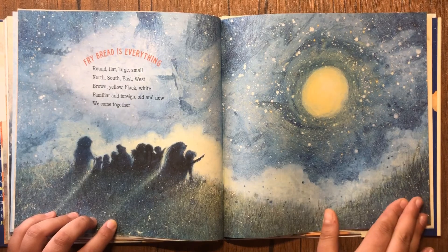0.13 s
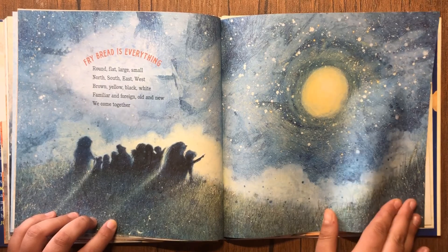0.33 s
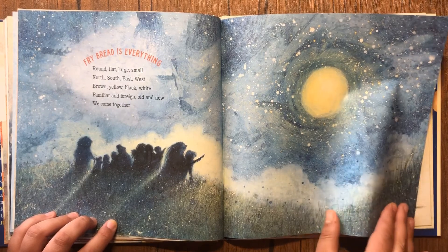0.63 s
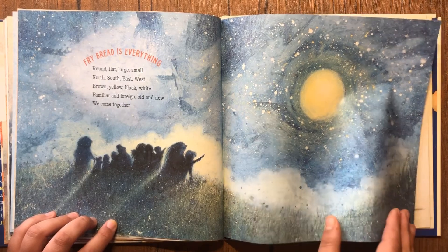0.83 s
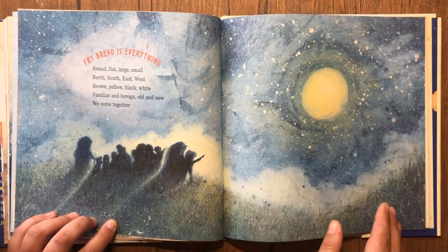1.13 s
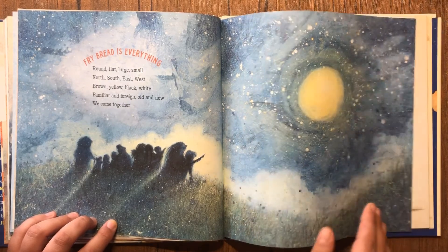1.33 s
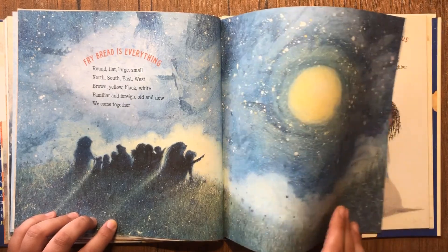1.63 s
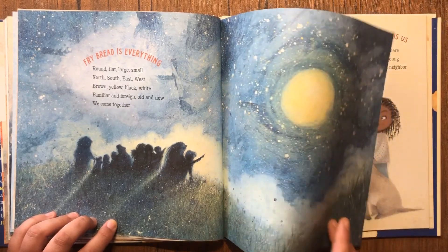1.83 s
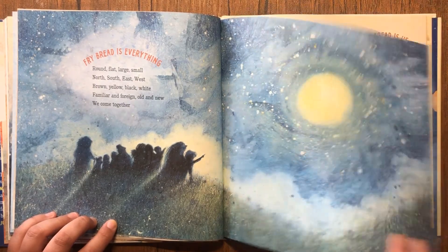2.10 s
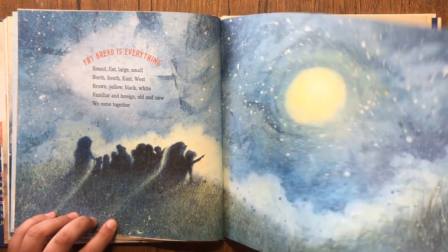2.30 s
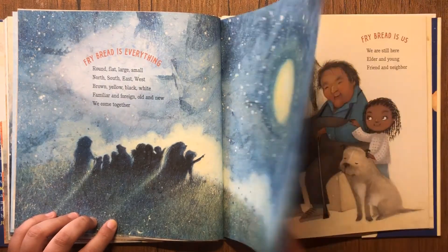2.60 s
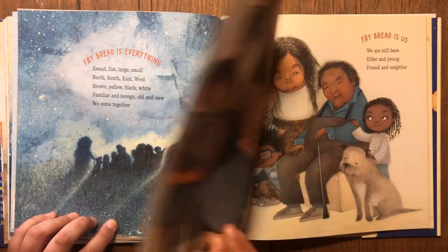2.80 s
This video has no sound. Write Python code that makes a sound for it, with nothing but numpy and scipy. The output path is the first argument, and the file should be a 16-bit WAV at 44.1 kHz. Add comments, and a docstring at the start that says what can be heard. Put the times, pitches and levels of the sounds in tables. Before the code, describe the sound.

A stiff book page is turned by hand, close to the microphone in a quiet room. Fingers push the paper, it pops once, slides with a hiss, then swings over with sharp ticks and dull pops.

```python
"""A table in a quiet room, one microphone close to a hardcover picture book as a stiff page is turned.
Over a low murmur of air, fingers push the sheet into an arch; at one second they grip it and it pops.
Its edge slides over the page below, and the resonance of the hollow under it falls as the hollow deepens.
Just after two seconds it slips free and swings over, buckling with dull pops, a brief hum and sharp ticks."""
import sys
import numpy as np
from scipy import signal
from scipy.fft import rfft, irfft, next_fast_len
from scipy.io import wavfile
from scipy.ndimage import uniform_filter1d, map_coordinates

SR = 44100
rng = np.random.default_rng(int(sys.argv[2]) if len(sys.argv) > 2 else 0)


def output_pcm(signal):
    """Save a mono or channel-first signal as 16-bit PCM at the path in sys.argv[1].

    Samples are clipped to [-1, 1] before scaling.
    """
    pcm = np.clip(np.atleast_2d(signal).T, -1, 1) * 32767
    wavfile.write(sys.argv[1], SR, np.round(pcm).astype(np.int16))


N = 130095
T = np.arange(N) / SR


def amp(db):
    """Decibels to gain."""
    return 10 ** (np.asarray(db) / 20)


def unit(x):
    """Scale to rms 1."""
    return x / np.sqrt(np.mean(x ** 2) + 1e-20)


def gain_at(colour, hz):
    """Gain between (Hz, dB) points, on a log frequency axis."""
    points_hz, points_db = np.transpose(colour)
    return amp(np.interp(np.log(hz + 1), np.log(points_hz), points_db))


def curve(rows, t, column=1):
    """One column of a control table at times t."""
    rows = np.array(rows)
    return np.interp(t, rows[:, 0], rows[:, column])


def level(rows):
    """Gain along (seconds, dB) rows, silent outside them."""
    return amp(curve(rows, T)) * (T >= rows[0][0]) * (T <= rows[-1][0])


def wander(per_s):
    """A smooth curve through per_s random values a second."""
    return map_coordinates(rng.standard_normal(N // 100), [T * per_s])


def coloured(x, gain):
    """Minimum-phase filter with the given gain over frequency."""
    size = 2 * next_fast_len(N // 2 + SR // 8)
    hz = np.fft.rfftfreq(size, 1 / SR)
    cepstrum = irfft(np.log(np.maximum(gain(hz), 1e-6)))
    cepstrum[1:size // 2] *= 2
    cepstrum[size // 2 + 1:] = 0
    return irfft(rfft(x, size) * np.exp(rfft(cepstrum)), size)[:N]


def slips(per_s, share):
    """Tiny random slips over a smooth hiss; share is their part of the power."""
    grains = (rng.random(N) < per_s / SR) * rng.standard_normal(N)
    return np.sqrt(share) * unit(grains) + np.sqrt(1 - share) * rng.standard_normal(N)


# The air all around the table. Each row: frequency in Hz, relative level in dB.
AIR_COLOUR = [(20, -29), (50, -2.5), (88, 2.5), (130, 3), (180, 0.5), (400, -3.5), (1000, -13.5),
              (3000, -21), (8000, -25), (15500, -26.5)]
# Faint steady tones in the room. Each row: frequency in Hz, level in dB.
ROOM_TONES = [(87, -64.5), (11800, -86)]


def room_tone():
    """Behind the book, a low murmur of air with a wavering hum and a faint whine."""
    air = amp(-57) * unit(coloured(rng.standard_normal(N), lambda hz: gain_at(AIR_COLOUR, hz)))
    tones = np.zeros(N)
    for hz, db in ROOM_TONES:
        drift = 0.027 * np.cumsum(rng.standard_normal(N))
        tones += amp(db) * unit(np.sin(2 * np.pi * hz * T + drift))
    return air + tones


def walls(x, t60_s=0.22, delay_s=0.004):
    """The short, soft answer of the walls, reaching the microphone just after the direct sound."""
    t = T[:SR // 2]
    dull_noise = signal.lfilter([1], [1, -0.6], rng.standard_normal(len(t)))
    tail = dull_noise * amp(-60 * t / t60_s) * (t > delay_s)
    return signal.fftconvolve(x, tail / np.linalg.norm(tail))[:N]


# The hum of the taut sheet. Each row: time in seconds, level in dB, pitch in Hz.
SHEET_HUM = [(2.19, -49, 688), (2.208, -35.5, 623), (2.24, -38, 552), (2.285, -48, 545)]


def sheet_hum():
    """One bending mode sings briefly and sinks as the sheet relaxes."""
    pitch_hz = curve(SHEET_HUM, T, 2) * (1 + 0.051 * wander(per_s=160))
    rasp = 1 + 0.5 * wander(per_s=220)
    return level(SHEET_HUM) * unit(rasp * np.sin(2 * np.pi * np.cumsum(pitch_hz) / SR))


# Sharp ticks of the paper. Each row: start in seconds, level in dB, seconds to fade by 60 dB.
EDGE_TICKS = [(.856, -42.5, .019), (2.012, -37, 0.019), (2.104, -35, .025), (2.1123, -26, 0.031),
              (2.53, -50, .02), (2.589, -32.5, 0.017)]
# Their colour. Each row: frequency in Hz, relative level in dB.
EDGE_TICK_COLOUR = [(500, -11), (2000, 3.5), (5000, 4), (9000, 0.5), (15500, -11)]


def edge_ticks():
    """The edge of the page cracks in short, bright bursts."""
    envelope = sum(amp(db - 60 * np.maximum(T - start, 0) / t60) * (T >= start)
                   for start, db, t60 in EDGE_TICKS)
    crackle = coloured(slips(per_s=4400, share=0.25), lambda hz: gain_at(EDGE_TICK_COLOUR, hz))
    return envelope * unit(crackle)


# The body of the sheet. Each row: frequency in Hz, relative level in dB.
SHEET_COLOUR = [(40, -50), (110, 0), (160, -10.5), (230, -0.5), (330, -6.5), (550, 3), (780, 1),
                (1000, -3.5), (1250, 0.5), (2000, -2), (8000, 14)]
# Its modes. Each row: multiple of the ring pitch, relative level in dB, seconds to fade by 60 dB.
RING_MODES = [(.4, -11, 0.091), (.7, -9, 0.081), (1.001, -0.5, 0.1), (1.52, 0, 0.024)]
# The sheet buckles. Each row: peak time in seconds, level in dB, seconds to rise by 20 dB, seconds to
# fade by 60 dB, lower and upper band edge in Hz, ring pitch in Hz, relative ring level in dB.
SHEET_BUCKLES = [(.986, -21.5, 0.0071, 0.043, 765, 1750, 824, -22),
                 (.9915, -23.5, 0.0011, 0.036, 920, 1547, 804, -3),
                 (1.652, -35, 0.022, .12, 525, 1180, 1132, -2),
                 (1.988, -32.5, 0.032, 0.1, 251, 1190, 903, 2.5),
                 (2.016, -44, .005, 0.26, 250, 1200, 630, -4), (2.106, -38, .004, .3, 250, 1350, 640, -12),
                 (2.168, -31.5, .015, 0.17, 70, 1180, 696, -11),
                 (2.188, -32.5, .018, 0.13, 121, 1370, 823, 2),
                 (2.333, -30.5, 0.019, 0.2, 130, 1170, 805, -8.5),
                 (2.565, -29.5, 0.016, 0.13, 350, 1380, 672, -4),
                 (2.611, -31, 0.022, 0.19, 60, 1390, 674, -1),
                 (2.682, -39, 0.035, 0.21, 100, 1060, 708, -3),
                 (2.828, -50.5, 0.0067, 0.25, 77, 760, 600, -8)]


def buckles(edge_order=4.6, sag=0.128, sag_s=0.0398):
    """Each buckle is a cluster of soft snaps that rings the sheet; the ring sinks as the bend relaxes."""
    out = np.zeros(N)
    for peak_s, db, rise, t60, low_hz, high_hz, pitch_hz, ring_db in SHEET_BUCKLES:
        def body(hz):
            low_cut = hz ** 2 / np.hypot(hz ** 2, low_hz ** 2)
            high_cut = 1 / np.sqrt(1 + (hz / high_hz) ** (2 * edge_order))
            return gain_at(SHEET_COLOUR, hz) * low_cut * high_cut

        before, after = np.minimum(T - peak_s, 0), np.maximum(T - peak_s, 0)
        swell = amp(20 * before / rise - 60 * after / t60)
        pop = swell * coloured(slips(per_s=3000, share=0.57), body)
        pop *= np.linalg.norm(swell) / np.linalg.norm(pop)
        cycles = pitch_hz * ((1 - sag) * after + sag * sag_s * (1 - np.exp(-after / sag_s)))
        ring = np.zeros(N)
        for multiple, mode_db, mode_t60 in RING_MODES:
            fade = amp(mode_db + rng.normal() - 60 * after / mode_t60)
            ring += fade * np.sin(2 * np.pi * multiple * cycles)
        out += amp(db) * (pop + amp(ring_db) * ring)
    return out


# The hollow under the arched sheet. Each row: time in seconds, lowest resonance in Hz.
HOLLOW_RESONANCE = [(.22, 2360), (.55, 2090), (.8, 1780), (1.17, 1410), (1.4, 1154), (1.65, 925),
                    (2.05, 790)]


def rub(stroke, colour, bands, peak_db, peak_width, below_db, hinge_hz, grain, flutter_db):
    """Paper slips on paper, and the hiss is coloured by the hollow and by gliding bands."""
    hz, t, spectrum = signal.stft(slips(per_s=5000, share=grain), SR, nperseg=512)
    hz = hz[:, None] + 1
    ratio = hz / curve(HOLLOW_RESONANCE, t)
    hollow_db = peak_db * np.exp(-((ratio - 1) / peak_width) ** 2)
    shelf_db = below_db * (1 - np.tanh((np.log2(ratio) + 0.37) * 7)) / 2  # below the resonance
    bands_db = sum(curve(band, t, 2) * np.exp(-((hz - curve(band, t)) / 184) ** 2) for band in bands)
    brightness_db = curve(stroke, t, 2) * np.log2(np.maximum(hz / hinge_hz, 1))  # above the hinge
    speckle = uniform_filter1d(rng.standard_normal(spectrum.shape), 3, axis=0)
    patches_db = 2.1 * unit(uniform_filter1d(speckle, 12, axis=1))  # the colour shifts at random
    gain = gain_at(colour, hz) * amp(hollow_db + shelf_db + bands_db + brightness_db + patches_db)
    gain /= np.sqrt(np.mean(gain ** 2, axis=0))
    hiss = signal.istft(spectrum * gain, nperseg=512)[1][:N]
    return unit(hiss) * level(stroke) * amp(flutter_db * wander(per_s=90))


# The four strokes of the hand. Each row: time in seconds, level in dB, brightness in dB per octave.
PUSH_STROKE = [(.2, -75, 2), (.224, -38.5, 1), (.28, -38, -0.5), (.31, -45, -3), (.384, -51.5, -1),
               (.424, -42.5, -1.5), (.52, -43.5, -1.5), (.606, -44.5, 0), (.676, -61, -0.5),
               (.705, -50.5, -2.5), (.784, -42, -4.5), (.88, -55, -5.5), (.898, -44.5, -0.5), (.93, -60, 1)]
GRIP_STROKE = [(.942, -60, -5), (.966, -34.5, 2.5), (.988, -40, 3.5), (1.004, -53, 2), (1.015, -47, 0),
               (1.046, -50, -6), (1.058, -36, -3.5), (1.08, -47, -4), (1.11, -77, -7)]
SLIDE_STROKE = [(1.148, -77, -5), (1.16, -37.5, -5), (1.22, -39, -10), (1.352, -36.5, -3), (1.58, -33.5, 0),
                (1.678, -39, 3), (1.91, -37.5, 4.5), (1.97, -41, -5), (1.986, -37.5, 4), (2.006, -54, -3),
                (2.014, -28.5, 4), (2.038, -37, 0.5), (2.055, -50.5, -4), (2.09, -62, 2)]
SWING_STROKE = [(2.101, -41, -1), (2.118, -36.5, 9), (2.146, -39.5, -1.5), (2.164, -32, 2), (2.206, -41, 2),
                (2.31, -41, 0), (2.432, -48, -1.5), (2.53, -44.5, 3.5), (2.546, -68, -8), (2.61, -66, 0),
                (2.68, -54.5, 2), (2.8, -54.5, 0), (2.864, -72, -2)]
# The colours of their hiss. Each row: frequency in Hz, relative level in dB.
PUSH_HISS = [(300, -15), (1000, -0.5), (2200, -1), (3400, -5.5), (5600, -3.5), (8600, -11.5), (11700, -11),
             (15500, -17)]
SLIDE_HISS = [(300, -18.5), (1000, -7), (2000, -6.5), (3600, 0), (5800, -2.5), (9200, -13), (12000, -11),
              (13000, -17), (15500, -19.5)]
SWING_HISS = [(300, 2.5), (2200, 2), (3300, -3), (3850, -0.5), (4400, -4.5), (7500, -9.5), (9200, -14),
              (15500, -21)]
# Narrow bands gliding in the hiss, one list a band. Each row: time in seconds, centre in Hz, lift in dB.
SLIDE_GLIDES = [
    [(1.2, 1750, 12), (1.4, 1400, 3)],
    [(1.22, 2800, 10.4), (1.3, 2400, 3.8), (1.55, 1970, 2.7)],
    [(1.23, 3800, 4.9), (1.3, 3600, 2.1), (1.56, 3600, 8), (1.95, 3660, 4.9)],
    [(1.22, 3200, -9), (1.32, 2760, -7)],
    [(1.32, 4950, 4.7), (1.46, 4850, 0.83)],
]
SWING_GLIDES = [
    [(2.13, 5000, 2), (2.165, 5010, 15), (2.48, 4830, 3.7)],
    [(2.27, 2760, 2.7), (2.32, 3140, 9.1), (2.44, 2790, 13), (2.7, 2630, 3.9)],
    [(2.35, 5400, 0), (2.47, 5770, 10), (2.68, 5440, 5)],
    [(2.14, 11000, 2), (2.22, 10750, 8.4), (2.5, 9700, 3.6)],
]


def page_rubbing():
    """Close to the microphone, the page rubs as it is pushed, gripped, slid and swung over."""
    push = rub(PUSH_STROKE, PUSH_HISS, [], peak_db=2.5, peak_width=0.18,
               below_db=-6.5, hinge_hz=1490, grain=0.44, flutter_db=0.84)
    grip = rub(GRIP_STROKE, SLIDE_HISS, SLIDE_GLIDES, peak_db=2, peak_width=0.18,
               below_db=3.5, hinge_hz=4070, grain=0.34, flutter_db=0.8)
    slide = rub(SLIDE_STROKE, SLIDE_HISS, SLIDE_GLIDES, peak_db=10.5, peak_width=0.11,
                below_db=-1.5, hinge_hz=4500, grain=0.37, flutter_db=0.5)
    swing = rub(SWING_STROKE, SWING_HISS, SWING_GLIDES, peak_db=0.5, peak_width=0.2,
                below_db=1.5, hinge_hz=1500, grain=0.35, flutter_db=1.6)
    return push + grip + slide + swing


def scene():
    """Heard from the table, in mono: the page up close, the walls and the air well behind it."""
    flexing = buckles() + sheet_hum() + edge_ticks()
    rubbing = page_rubbing()
    reflections = amp(-13.5) * walls(flexing + amp(-4.5) * rubbing)
    return (flexing + rubbing + reflections + room_tone())[None]


def record(dry, low_cut_hz=51, top_hz=15900):
    """The microphone loses the deepest bass and passes nothing above top_hz."""
    size = next_fast_len(N + SR // 4)
    hz = np.fft.rfftfreq(size, 1 / SR)
    response = hz ** 2 / np.hypot(hz ** 2, low_cut_hz ** 2) * (hz < top_hz)
    return irfft(rfft(dry, size) * response, size)[:, :N]


dry = scene()
out = record(dry)
output_pcm(out)
```